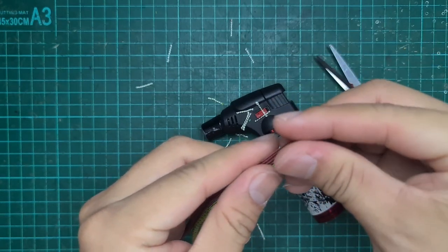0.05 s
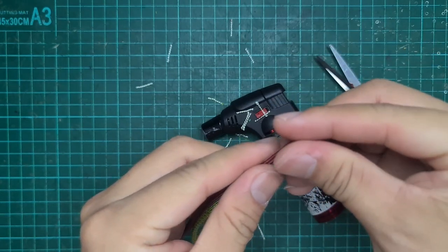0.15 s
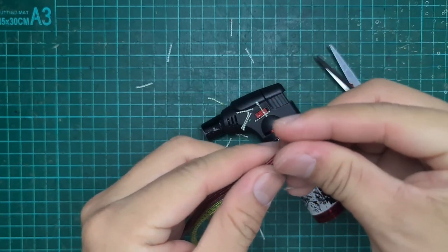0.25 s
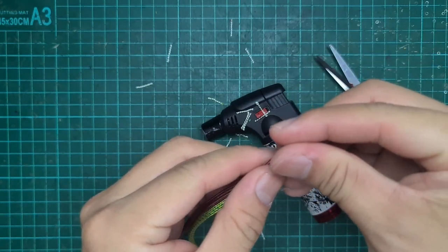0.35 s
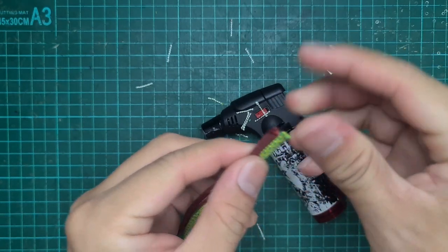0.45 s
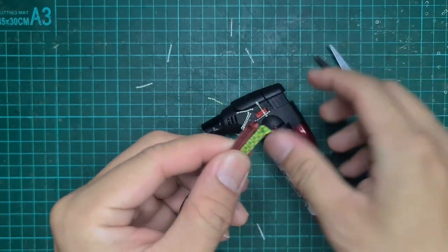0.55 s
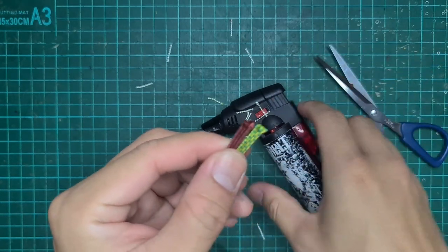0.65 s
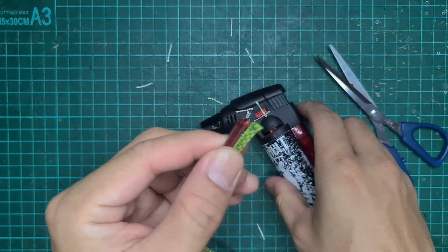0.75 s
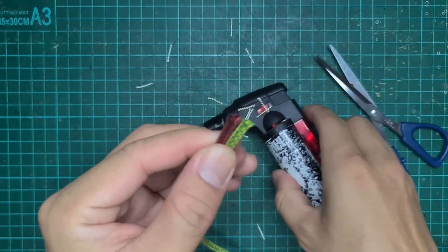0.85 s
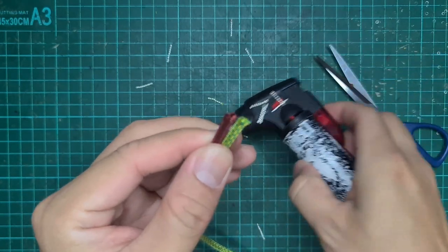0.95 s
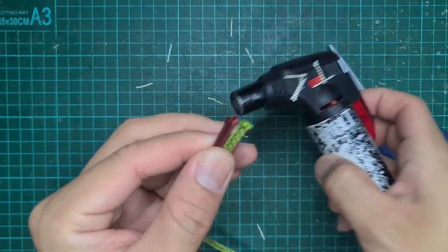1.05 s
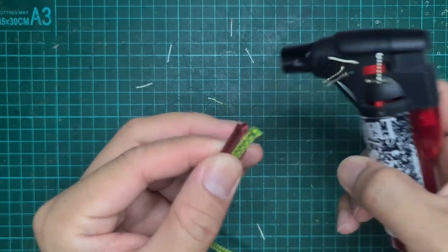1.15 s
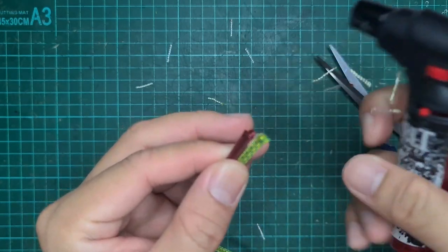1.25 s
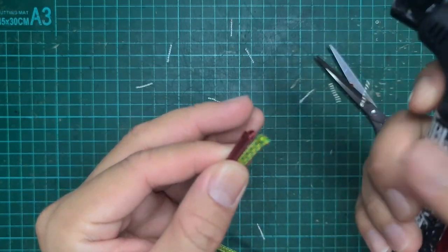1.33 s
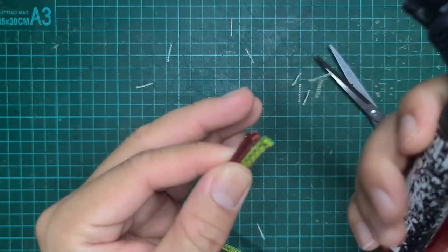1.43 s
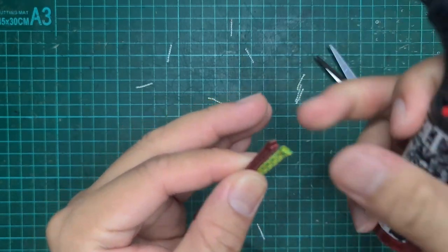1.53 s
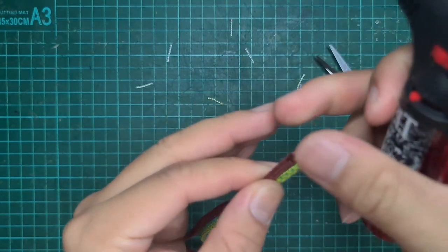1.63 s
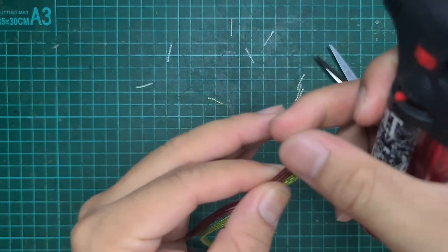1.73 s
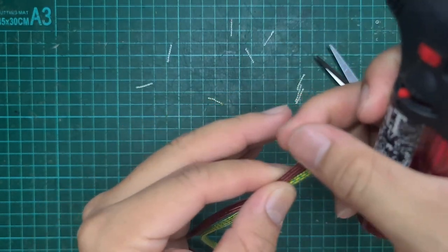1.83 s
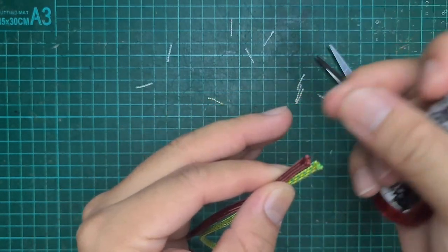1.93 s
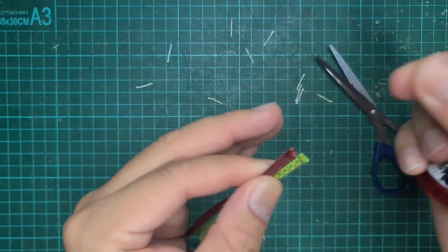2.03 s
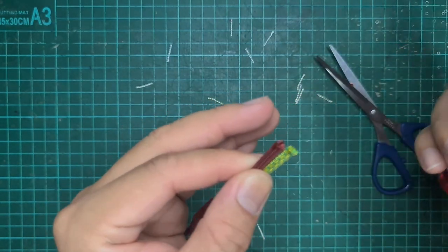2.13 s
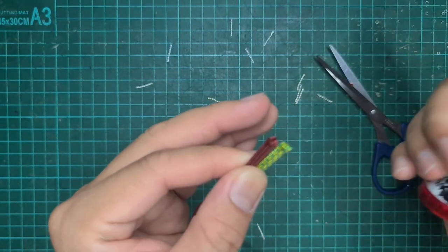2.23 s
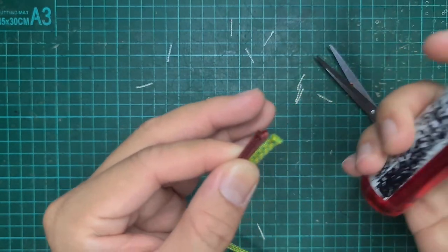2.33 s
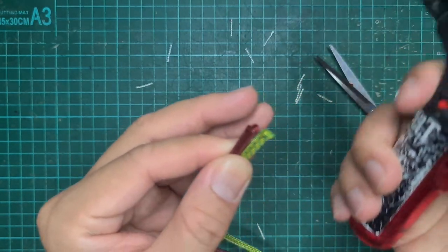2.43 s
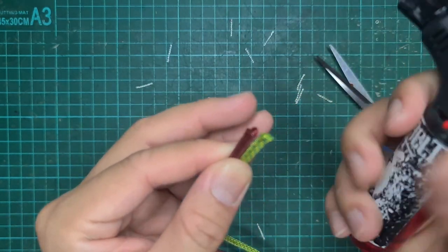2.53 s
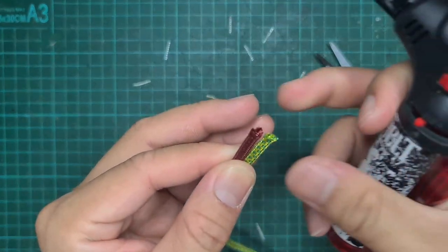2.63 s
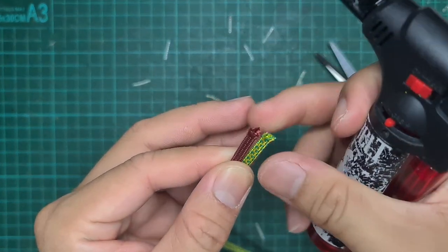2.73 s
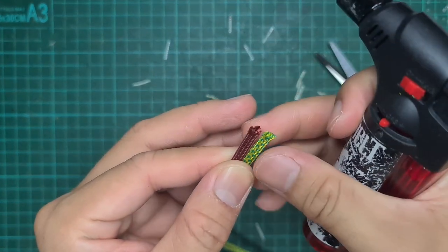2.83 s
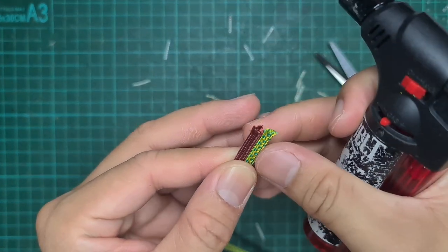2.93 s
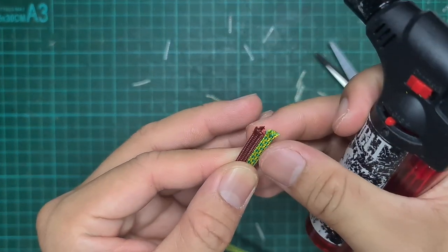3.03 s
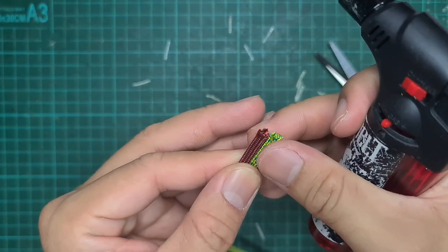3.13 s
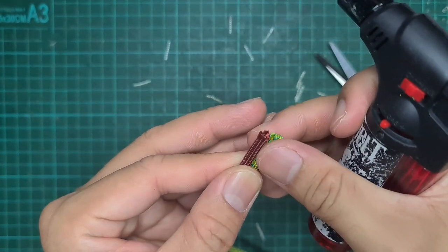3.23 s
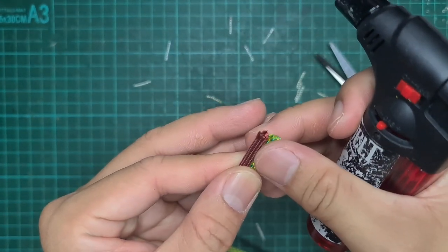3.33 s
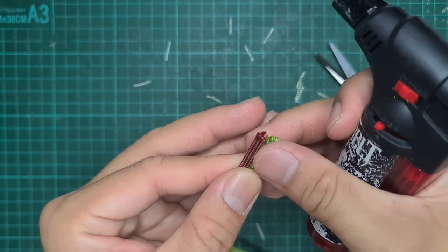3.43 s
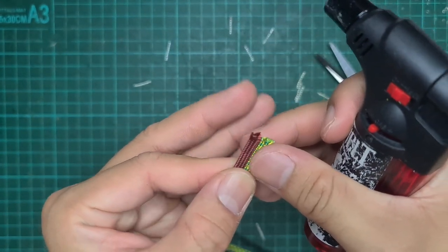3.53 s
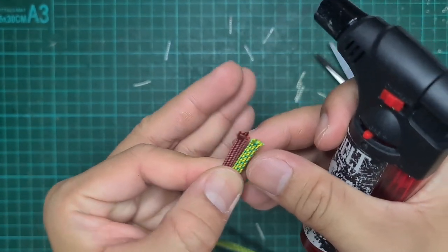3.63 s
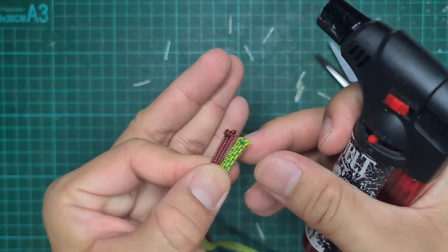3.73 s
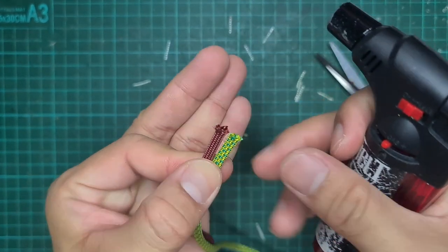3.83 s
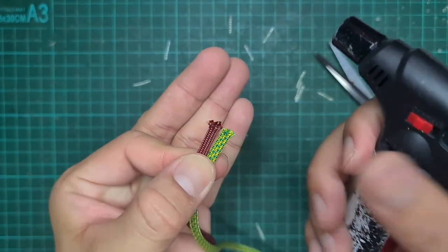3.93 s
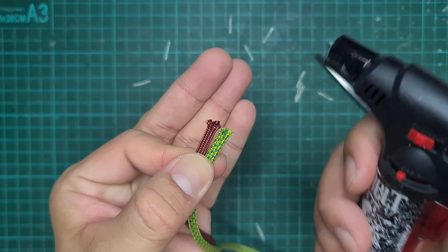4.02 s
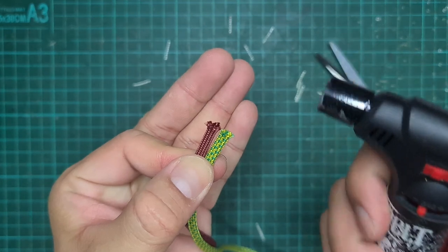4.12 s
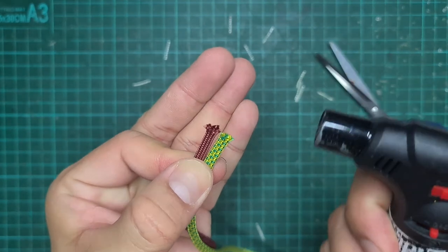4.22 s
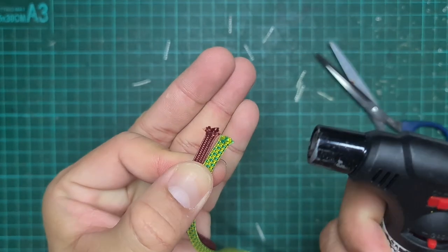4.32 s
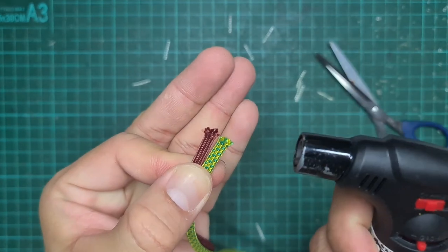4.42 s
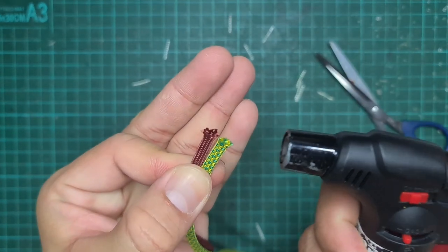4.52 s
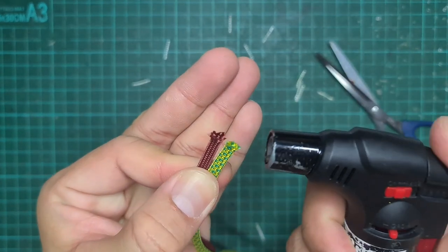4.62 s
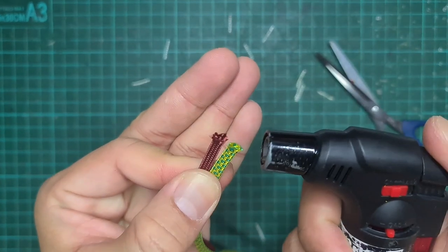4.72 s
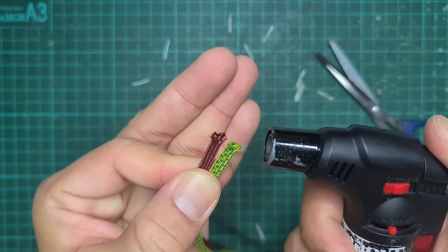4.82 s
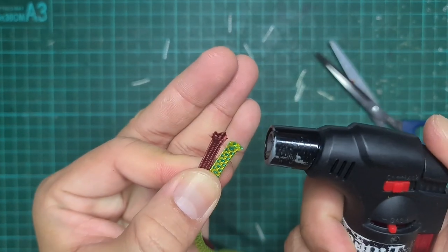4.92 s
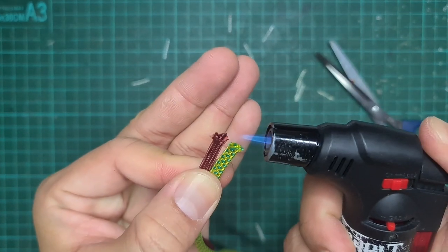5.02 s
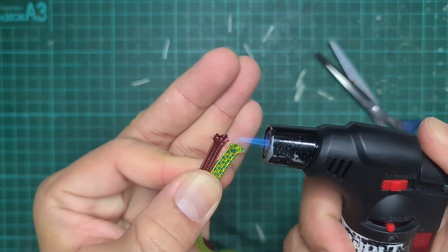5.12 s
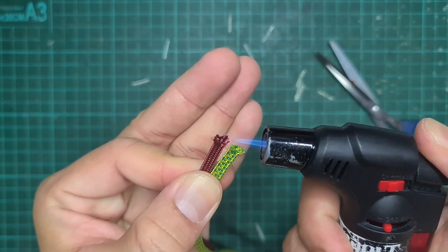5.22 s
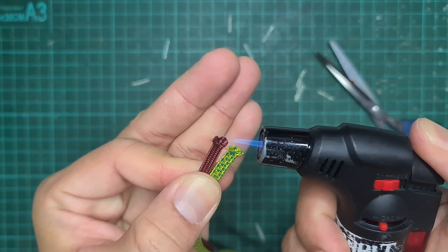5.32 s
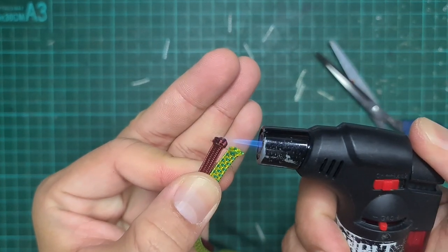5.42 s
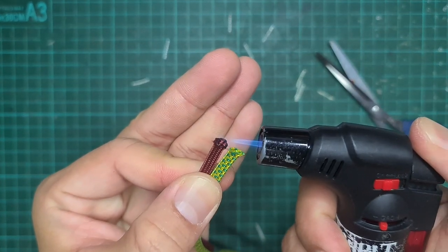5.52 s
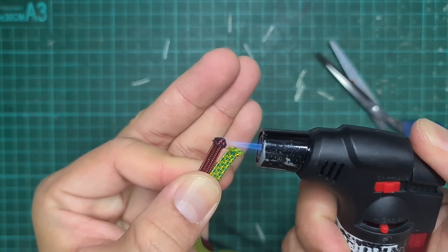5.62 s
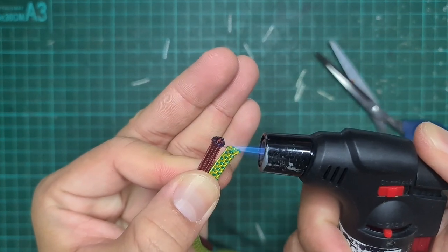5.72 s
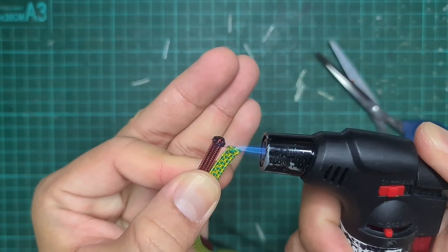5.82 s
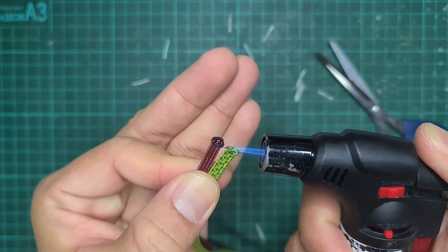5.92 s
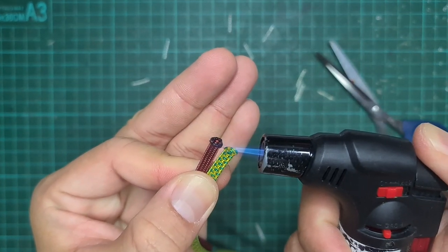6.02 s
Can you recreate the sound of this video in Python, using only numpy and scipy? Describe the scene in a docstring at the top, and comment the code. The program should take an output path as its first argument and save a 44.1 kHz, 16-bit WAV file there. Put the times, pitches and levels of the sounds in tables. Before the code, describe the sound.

Faint plastic knocks and soft skin rustles in a quiet room, then a sharp loud igniter snap and a steady, fluttering jet-flame hiss.

```python
"""First a hush of room air and soft skin noise, then knocks as hands pick a plastic torch lighter
up from a cutting mat and turn it while holding a piece of cord. The piezo igniter snaps and a jet
flame burns steadily to the end, close to the microphone in a small, quiet room. Snap and knocks are
dying modes with noise bursts; flame, finger, shell and room sounds are noise shaped by tables.
Filtered noise tails give the reflections."""
import sys
import numpy as np
from scipy import signal
from scipy.fft import rfft, irfft, next_fast_len
from scipy.io import wavfile
from scipy.ndimage import uniform_filter1d

SR = 44100
rng = np.random.default_rng(int(sys.argv[2]) if len(sys.argv) > 2 else 0)


def int16_out(signal):
    """Quantize to a 16-bit WAV file."""
    q = np.round(np.clip(np.atleast_2d(signal).T, -1, 1) * 32767)
    wavfile.write(sys.argv[1], SR, q.astype(np.int16))


N = 267334
TIME = np.arange(N) / SR

# what the piezo hammer rings: pitch_hz, relative level_db, t60_s, left_over_right_db
IGNITER_MODES = [(1720, 2.5, 0.011, 5), (2050, -6, .009, 0), (2790, -3, 0.0089, 6),
                 (3156, -14.5, 0.025, -7), (4736, -9.5, 0.0085, -4), (5920, -8, 0.014, 8),
                 (6936, -4, 0.014, 4), (7590, 0, 0.013, 1.5), (8530, -8.5, .01, 5), (9750, -3, 0.0099, 7.5),
                 (12450, -6, .01, -4), (13860, -11, 0.0098, -6.5), (15000, -16, .01, 7.5),
                 (169.2, -31.5, 0.064, -1), (647, -23, 0.02, 3.5)]
# the hammer's dry crack, spectral shape: freq_hz, density_db
CRACK_SHAPE = [(900, -6), (1500, 6.5), (2100, 4), (3200, 2), (4400, -1.5), (7000, 7), (10000, 6),
               (15000, -11)]
# faint after-ring of spring and nozzle: pitch_hz, relative level_db, t60_s
METAL_MODES = [(1750, -37.5, 0.22), (2930, -40, 0.26), (3040, -45.5, .26), (3190, -38, 0.35),
               (3560, -38, 0.16), (6800, -36.5, .22), (7430, -39.5, .24), (7900, -35.5, .22),
               (9840, -40.5, .22)]
# the snap as it spreads sideways into the room, spectral shape: freq_hz, density_db
SNAP_SPREAD_SHAPE = [(100, 3.5), (420, -17.5), (650, -9), (950, -18.5), (1600, 3.5), (2300, -4.5),
                     (3000, 4.5), (4400, -3.5), (5800, -4.5), (7300, -1), (9500, -5.5), (11000, -9.5),
                     (12500, -9), (15000, -15)]
# the band just below the shell's first strong mode, where it gives off little: centre_hz, width_hz
SHELL_DIP = (1130, 470)
# turbulent roar of the flame, spectral shape: freq_hz, density_db
ROAR_SHAPE = [(100, -32), (200, -17.5), (330, -22), (400, -15), (510, -21.5), (590, 2), (680, -2.5),
              (800, 3.5), (980, -7.5), (1250, -1.5), (1620, -17), (1720, -6.5), (2250, -16), (2850, -18)]
# hiss of gas in the nozzle, spectral shape: freq_hz, density_db
HISS_SHAPE = [(1500, -17.5), (3100, -0.5), (4000, -24), (4900, -7.5), (5500, -17.5), (6500, -24.5),
              (7800, -13), (8800, -23), (10500, -6), (11800, 1), (12600, 3.5), (13400, 6.5), (14600, 1.5),
              (15400, 5)]
# resonances of the hollow shell, stirred by fingers and jet: freq_hz, gain_db
SHELL_COLOUR = [(200, -15.5), (450, -2.5), (620, -13.5), (820, -4), (1350, -5), (1650, 3), (2050, -13.5),
                (2800, -14.5), (3500, -16), (5500, -21), (6600, -15), (9000, -33.5), (12000, -18.5),
                (16000, -29)]
# knocks on the shell: start_s, nominal peak level_db, contact_s, struck panel pitch_hz,
# left_over_right_db, crunch t60_s
KNOCK_EVENTS = [(0.722, -30, 0.0012, 1380, -1.5, 0.027), (0.777, -36.5, 0.001, 1460, 0, 0.043),
                (0.789, -33, 0.00097, 1430, -1.5, 0.042), (0.871, -32.5, 0.00053, 2470, 2.5, .012),
                (1.188, -41.5, 0.00056, 1260, 1.5, .018), (1.208, -43.5, 0.00032, 1480, -5.5, .025),
                (1.265, -37, 0.00014, 2580, -4, 0.017), (1.269, -40.5, .00016, 4280, 3, 0.036),
                (1.28, -42.5, 0.00036, 1700, -4, 0.015), (1.458, -44.5, 0.00051, 1650, -5, 0.095),
                (1.507, -50, 0.00028, 1600, -7, 0.031), (2.238, -34.5, 0.00039, 3140, -3.5, 0.038),
                (2.468, -50.5, .0003, 2920, -7, 0.018), (2.484, -40.5, 0.00027, 1720, -9, 0.021),
                (2.5, -31.5, .00018, 3670, 0, .016), (4.258, -32, 0.00038, 2520, -2, 0.028),
                (4.27, -39.5, .00055, 1600, -1, 0.026), (4.364, -51, 0.00056, 1440, -5, .04),
                (4.389, -46, 0.00079, 1420, -5, .06), (4.594, -51, 0.00072, 1530, 0, .04),
                (4.865, -56.5, 0.00059, 1730, 7, .02)]
# modes of the plastic shell, detuned a little at each knock: pitch_hz, relative level_db, t60_s
SHELL_MODES = [(480, -4, 0.018), (810, 2.5, 0.011), (1033, -4.5, 0.017), (1303, -2.5, 0.021),
               (1427, -3, 0.023), (1720, -5, 0.031), (2032, -2.5, 0.021), (2500, 1, 0.018),
               (2900, 0, 0.015), (3277, -4.5, .016), (3560, 4, 0.0065), (4280, -6, 0.0097),
               (4760, -14, 0.0068), (5660, -26, .006)]
# gritty crunch of a contact, spectral shape: freq_hz, density_db
GRIT_SHAPE = [(200, -10), (700, -10), (1200, -6.5), (2300, 2), (4000, 5), (6000, 2), (9500, 5), (12000, 1),
              (15000, -14)]
# thin swish of the lighter dragged off the mat: middle_s, length_s
DRAG_TIMING = (0.728, .25)
# skin brushing cord and plastic: middle_s, length_s, level_db before the swell, centre_hz
RUB_EVENTS = [(0.467, 0.21, -75, 5160), (0.732, 0.39, -75.5, 6400), (1.05, 0.39, -80, 8000),
              (1.19, 0.14, -70.5, 8000), (1.265, 0.043, -61, 8000), (1.364, .2, -64.5, 9200),
              (1.505, .07, -69, 7800), (1.997, 0.097, -73, 8000), (2.123, 0.066, -63.5, 10900),
              (2.137, 0.052, -67, 3780), (2.238, 0.081, -69, 6900), (2.342, 0.048, -60.5, 9600),
              (2.426, .11, -69.5, 2590), (2.482, .025, -65, 9000), (2.631, 0.26, -77, 7000),
              (3.851, 0.25, -72.5, 8300), (4.089, 0.18, -70.5, 9100), (4.397, 0.15, -71.5, 2500)]
# still room, spectral shape: freq_hz, density_db
AIR_SHAPE = [(20, -17.5), (45, -1.5), (80, 1.5), (120, -15), (190, -16.5), (280, -22), (600, -24),
             (1000, -29.5), (1800, -31), (2700, -37), (3400, -35), (4700, -37.5), (5500, -41.5),
             (7500, -43.5), (12000, -43), (16000, -48)]
# left-right likeness of the still room: freq_hz, likeness (0 to 1)
AIR_LIKENESS = [(60, 0.97), (200, 0.78), (500, 0.27), (1500, 0.0018), (4000, 0.026), (15000, 0.0089)]
# how long the reflections take to die: freq_hz, t60_s
ROOM_DECAY = [(150, 0.22), (1000, 0.26), (3000, 0.24), (7000, 0.31), (14000, 0.28)]
# tone of the reflections: freq_hz, gain_db
ROOM_TONE = [(150, 13.5), (900, -2), (1700, 1.5), (2400, -0.5), (3300, 4), (4000, 4), (5500, 1.5),
             (7500, 7), (10000, -0.5), (15000, -6)]
# left-right likeness of reflections, crunch and murmur: freq_hz, likeness (0 to 1)
ROOM_LIKENESS = [(100, 0.94), (700, .8), (1400, 0.2), (2500, 0), (15000, 0.11)]

IGNITION_S = 5.0342
ROAR_DB, HISS_DB, MURMUR_DB = -59.5, -68, -65  # jet layers, before flutter and reflections
BUILD_S = 0.001  # a contact builds up
REBOUND_S, REBOUND_DB = 0.0058, -14  # the loose shell touches once more
DRAG_DB, DRAG_HZ, DRAG_OCTAVES = -67.5, 5050, 0.17
RUB_OCTAVES, RUB_PAN_DB = 1, 2.5
GRIP_DB, TIGHTEN_DB_PER_S = -71.5, 2.5  # level reached at ignition, and the climb up to it
EDGE_HZ = 15550  # the recorder's band limit


def igniter(level_db=-7.5, rise_s=0.00061, crack_db=-5, crack_t60=0.018, crack_pan_db=3,
            metal_db=-4, spread_db=6):
    """The sprung hammer hits the crystal: a hard crack, short modes, faint metal, the room's answer."""
    t = np.arange(SR // 2) / SR
    modes = sum(amp(db) * sides(pan_db) * ring(hz, t60, t) for hz, db, t60, pan_db in IGNITER_MODES)
    crack = colour(rng.standard_normal((2, len(t))), lambda f: read(CRACK_SHAPE, f))
    crack = sides(crack_pan_db) * crack * amp(-60 * t / crack_t60)
    snap = amp(level_db) * (modes + amp(crack_db) * crack)
    metal = sum(amp(db + metal_db) * ring(hz, t60, t) for hz, db, t60 in METAL_MODES)
    onset = 1 - np.exp(-(t / rise_s) ** 2)
    direct = shell_dip((snap + metal) * onset)

    impulse = np.ones((2, 1)) * (t == 0)
    answer = colour(echoes(impulse), lambda f: spread_db + read(SNAP_SPREAD_SHAPE, f))
    fade_out = np.minimum((t[-1] - t) * 10, 1)  # over the last 0.1 s
    return (direct + answer) * fade_out


def shell_dip(x):
    """The shell hardly sounds just below its first strong mode: a notch takes that band out."""
    hz, width = SHELL_DIP
    return signal.lfilter(*signal.iirnotch(hz, hz / width, SR), x)


def flame(flutter_db=1.1, catch_s=0.044, roll_off_db=45, whistle_hz=11800, whistle_width_hz=60,
          whistle_db=4):
    """Gas hisses at once with a faint whistle; the roar builds, flutters and stirs the shell."""
    age = np.arange(SR * 6 // 5) / SR
    caught = 1 - np.exp(-age / catch_s)
    flutter = amp(flutter_db * unit(uniform_filter1d(rng.standard_normal(len(age)), 1500)))

    def roar_gain(f):
        octaves_above = np.log2(np.maximum(f / ROAR_SHAPE[-1][0], 1))
        return read(ROAR_SHAPE, f) - roll_off_db * octaves_above

    def hiss_gain(f):
        whistle = whistle_db / (1 + ((f - whistle_hz) / whistle_width_hz) ** 2)
        return read(HISS_SHAPE, f) + whistle

    roar = unit(colour(rng.standard_normal(len(age)), roar_gain))
    roar = roar * flutter * amp(ROAR_DB) * caught
    hiss = amp(HISS_DB) * unit(colour(rng.standard_normal(len(age)), hiss_gain))
    shell = amp(MURMUR_DB) * caught * murmur(len(age), grain_db=2)
    roar_in_room = room(roar * sides(pan_db=2.0), wet_db=1.0)
    hiss_in_room = room(hands(hiss) * sides(pan_db=-2.0), wet_db=7.0)
    return roar_in_room + hiss_in_room + shell


def hands(x, bounce_db=-11, reach_s=0.0029, count=6):
    """Hands and mat scatter the hiss: very short reflections ripple each side's spectrum differently."""
    out = np.array([x, x])
    for side in out:
        for delay in rng.uniform(0, reach_s, count):
            bounced = np.pad(x, (int(delay * SR) + 8, 0))[:len(x)]  # at least 8 samples late
            side += amp(bounce_db) * rng.choice([-1, 1]) * bounced
    return out


def knocks():
    """Fingers and mat knock the loose shell; each knock is followed by a weaker rebound."""
    out = np.zeros((2, N))
    for start_s, db, *contact in KNOCK_EVENTS:
        add(out, start_s, knock(db, *contact))
        add(out, start_s + REBOUND_S, knock(db + REBOUND_DB, *contact))
    return out


def knock(db, contact_s, panel_hz, pan_db, grit_t60, grit_db=7, crest_db=20.0, panel_db=6,
          panel_octaves=0.18, slope=5.4, thud_db=-16):
    """A contact crunches and rings the shell: shorter is brighter; the struck panel stands out."""
    t = np.arange(SR // 20) / SR
    radiated = [(700, thud_db), (1300, 0)]  # freq_hz, gain_db: a small shell gives off little bass

    def weight(f):
        softness = 10 * np.log10(1 + (f * contact_s) ** slope)
        panel = panel_db * np.exp(-(np.log2((f + 1) / panel_hz) / panel_octaves) ** 2)
        return read(radiated, f) - softness + panel

    modes = sum(amp(mode_db + weight(hz)) * ring(hz * rng.uniform(0.95, 1.04), t60, t)
                for hz, mode_db, t60 in SHELL_MODES)
    noise = pair(rng.standard_normal((2, len(t))), ROOM_LIKENESS)
    grit = colour(noise, lambda f: weight(f) + read(GRIT_SHAPE, f))
    grit = amp(grit_db) * grit * amp(-60 * t / grit_t60)
    hit = (modes + grit) * (1 - np.exp(-(t / BUILD_S) ** 2))
    return amp(db - crest_db) * sides(pan_db) * unit(hit)  # a knock's rms lies well below its peak


def ring(hz, t60, t, apart_hz=2300):
    """A dying mode; the higher it is, the more left and right differ in phase, up to a quarter turn."""
    start = rng.uniform(0, 2 * np.pi)
    spread = -np.pi / 4 * min(hz / apart_hz, 1) ** 2
    phase = 2 * np.pi * hz * t + start + np.array([[spread], [-spread]])
    return amp(-60 * t / t60) * np.sin(phase)


def rubs():
    """Friction noise as the lighter slides off the mat and fingers brush the cord and the shell."""
    out = np.zeros((2, N))
    add(out, *stroke(*DRAG_TIMING, DRAG_DB, DRAG_HZ, DRAG_OCTAVES, pan_db=-3))
    for row in RUB_EVENTS:
        add(out, *stroke(*row, RUB_OCTAVES, RUB_PAN_DB))
    return out


def stroke(middle_s, length_s, db, centre_hz, octaves, pan_db, grain_db=3):
    """A swell of friction noise, grainy as the surfaces catch; returns its start and its sound."""
    size = int(length_s * SR)
    grain = amp(grain_db * unit(uniform_filter1d(rng.standard_normal(size), 60)))

    def band(f):
        return -10 * np.log10(1 + (np.log2((f + 1) / centre_hz) / octaves) ** 4)

    friction = unit(colour(rng.standard_normal((2, size)) * grain, band))
    return middle_s - length_s / 2, amp(db) * sides(pan_db) * friction * np.hanning(size)


def grip():
    """Fingers creep on the shell, stirring its resonances louder as they tighten until ignition."""
    tightening = amp(GRIP_DB + TIGHTEN_DB_PER_S * (TIME - IGNITION_S))
    return murmur(N, grain_db=2.5) * tightening * (TIME < IGNITION_S)


def murmur(size, grain_db):
    """Uneven noise through the resonances of the hollow shell."""
    grain = amp(grain_db * unit(uniform_filter1d(rng.standard_normal(size), 700)))
    noise = pair(rng.standard_normal((2, size)), ROOM_LIKENESS) * grain
    return unit(colour(noise, lambda f: read(SHELL_COLOUR, f)))


def room(x, wet_db):
    """A close source with its reflections, tinted by the room."""
    return x + amp(wet_db) * colour(echoes(x), lambda f: read(ROOM_TONE, f))


def echoes(x, delay_s=0.0038, lumpy_db=2.0, settle_s=.06):
    """Desk and near walls reflect: uneven at first, then smoother, each band dying at its own speed."""
    size = SR // 3
    taps = pair(rng.standard_normal((2, size)), ROOM_LIKENESS)
    lumps = unit(uniform_filter1d(rng.standard_normal(size), 70))
    taps = taps * amp(lumpy_db * lumps * np.exp(-np.arange(size) / SR / settle_s))
    hz, t, bands = signal.stft(taps, SR, nperseg=256)
    decay = amp(-60 * t / read(ROOM_DECAY, hz)[:, None])
    tail = signal.istft(bands * decay, SR, nperseg=256)[1]
    tail *= np.arange(tail.shape[1]) / SR > delay_s
    return signal.oaconvolve(x, tail / np.linalg.norm(tail[0]), axes=1)[:, :x.shape[1]]


def air(level_db=-60):
    """Low rumble of the building under a faint even hiss, as shaped noise."""
    noise = pair(rng.standard_normal((2, N)), AIR_LIKENESS)
    return amp(level_db) * unit(colour(noise, lambda f: read(AIR_SHAPE, f)))


def amp(db):
    """Decibels to linear gain."""
    return 10 ** (np.asarray(db) / 20)


def unit(x):
    """Scales a sound to an rms of one."""
    return x / np.sqrt(np.mean(x ** 2) + 1e-30)


def read(points, hz):
    """A table's value at hz, on a log-frequency axis."""
    f, value = np.transpose(points)
    return np.interp(np.log(hz + 1), np.log(f + 1), value)


def sides(pan_db):
    """Left and right gains for a level difference."""
    return amp(np.array([[.5], [-.5]]) * pan_db)


def add(mix, start_s, sound):
    """Lays a sound into the mix, cut off at its end."""
    part = mix[:, max(round(start_s * SR), 0):][:, :sound.shape[1]]
    part += sound[:, :part.shape[1]]


def colour(x, gain_db):
    """Filters x by a function from Hz to dB."""
    size = next_fast_len(x.shape[-1], True)
    gain = amp(gain_db(np.fft.rfftfreq(size, 1 / SR)))
    return irfft(rfft(x, size) * gain, size)[..., :x.shape[-1]]


def pair(x, likeness):
    """Makes two unrelated channels partly alike, band by band."""
    size = next_fast_len(x.shape[1], True)
    a, b = rfft(x, size)
    same = np.clip(read(likeness, np.fft.rfftfreq(size, 1 / SR)), -1, 1)
    return irfft(np.array([a, same * a + np.sqrt(1 - same ** 2) * b]), size)[:, :x.shape[1]]


def scene():
    """Handling, ignition and flame in one room."""
    mix = room(knocks(), wet_db=-10.5) + room(rubs(), wet_db=-5) + grip() + air()
    add(mix, IGNITION_S, igniter())
    add(mix, IGNITION_S, flame())
    return mix


def record(dry, ceiling=0.97):
    """The recorder softly rounds off the highest peaks, then cuts the treble at its band limit."""
    rounded = dry / (1 + (dry / ceiling) ** 6) ** (1 / 6)
    low_pass = signal.firwin(401, EDGE_HZ, window=("kaiser", 8), fs=SR)
    return signal.oaconvolve(rounded, low_pass[None], "same")


dry = scene()
out = record(dry)
int16_out(out)
```